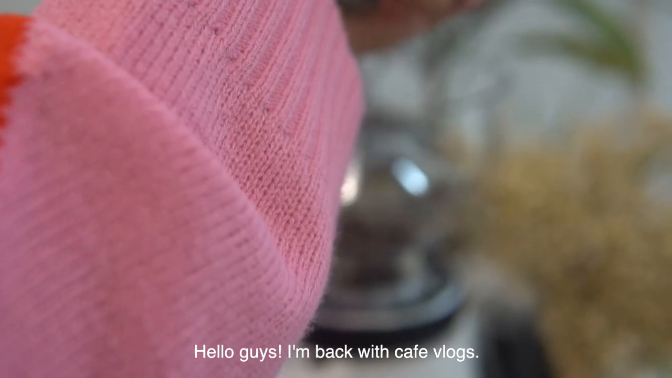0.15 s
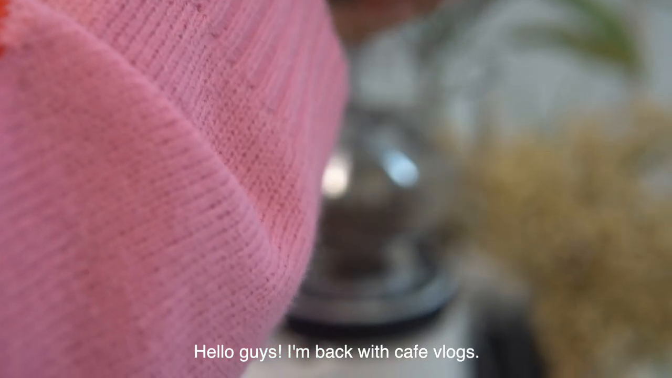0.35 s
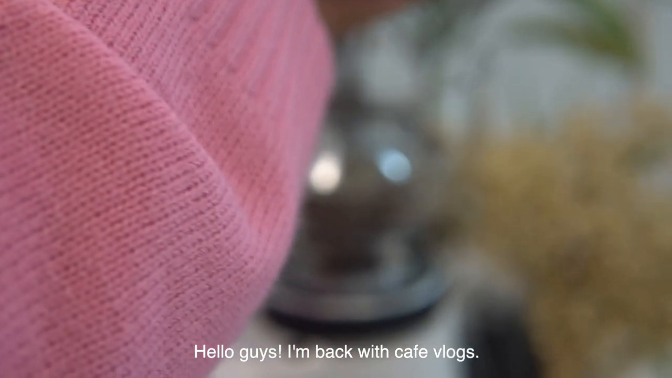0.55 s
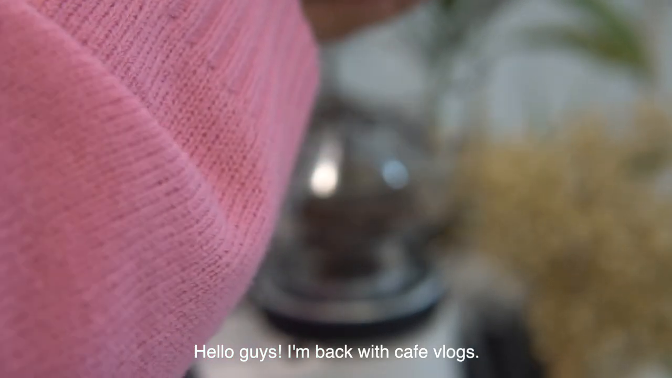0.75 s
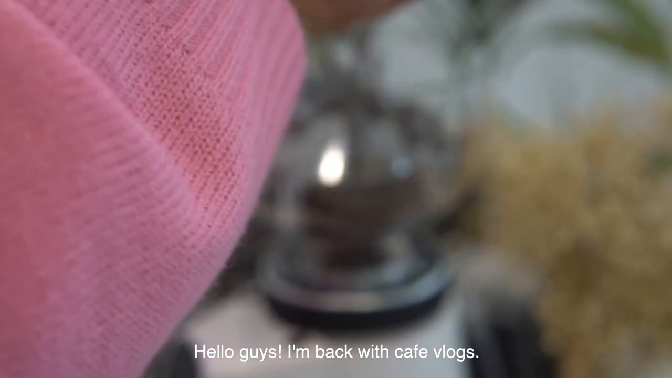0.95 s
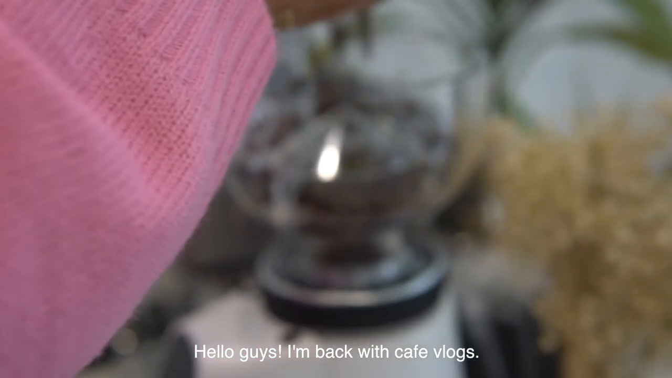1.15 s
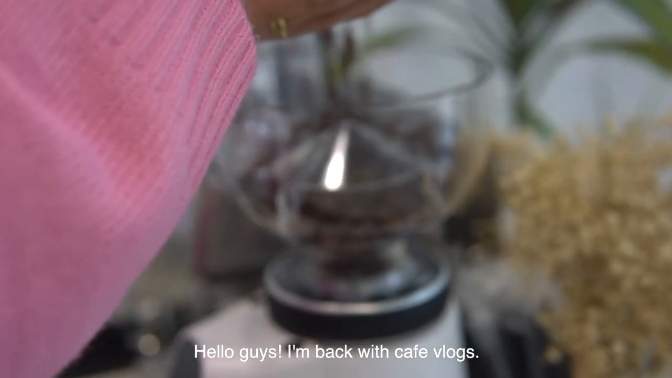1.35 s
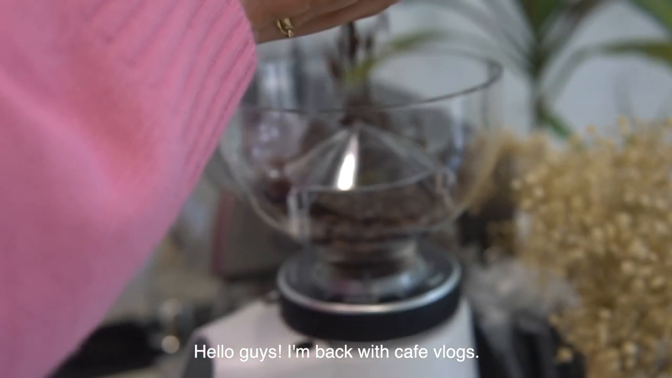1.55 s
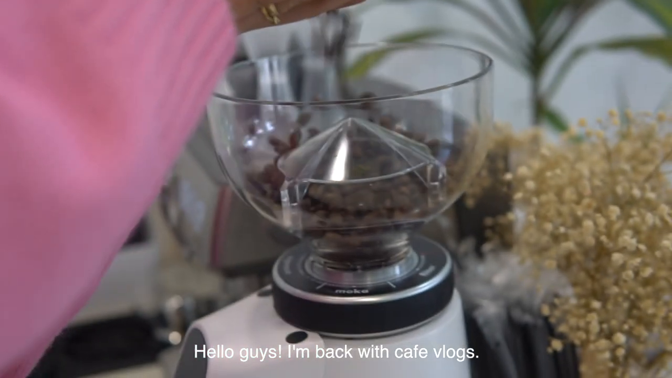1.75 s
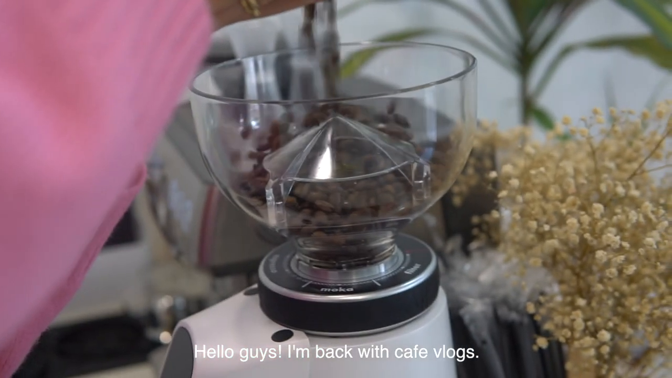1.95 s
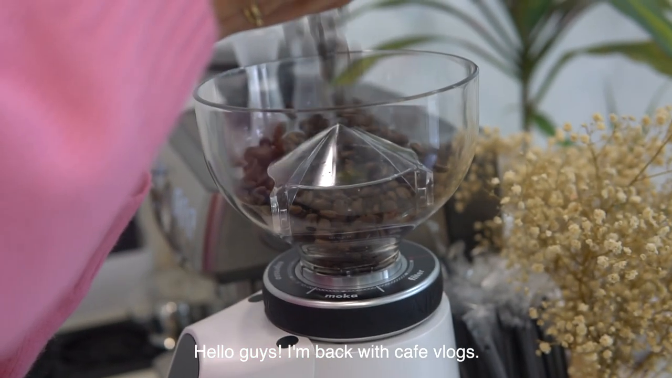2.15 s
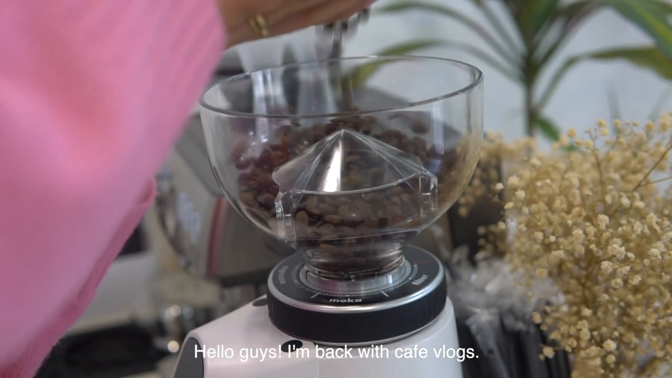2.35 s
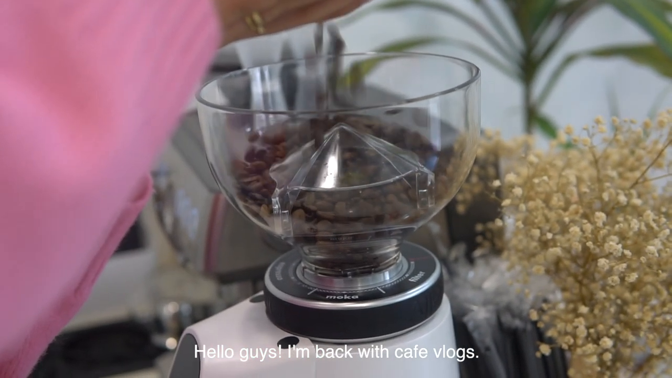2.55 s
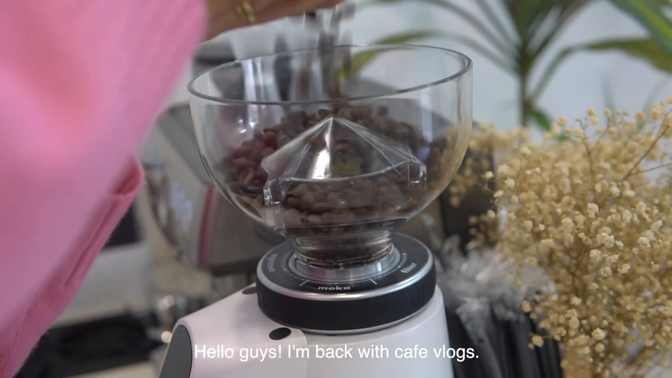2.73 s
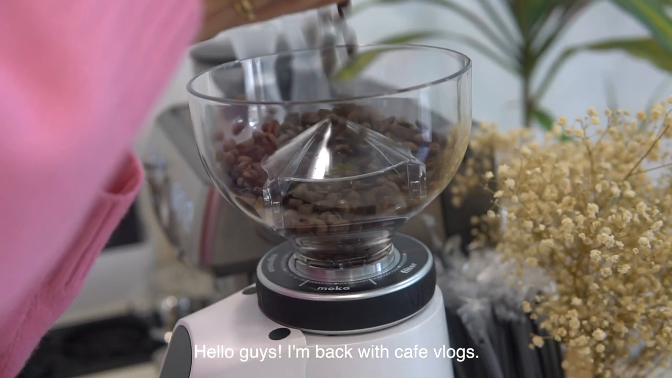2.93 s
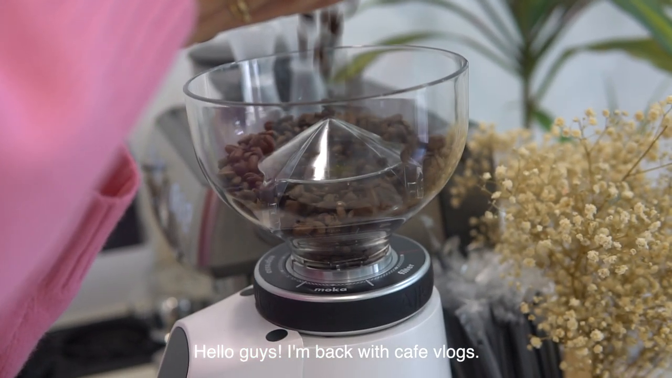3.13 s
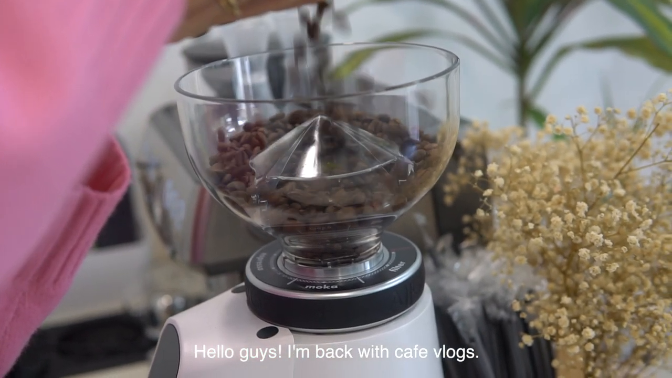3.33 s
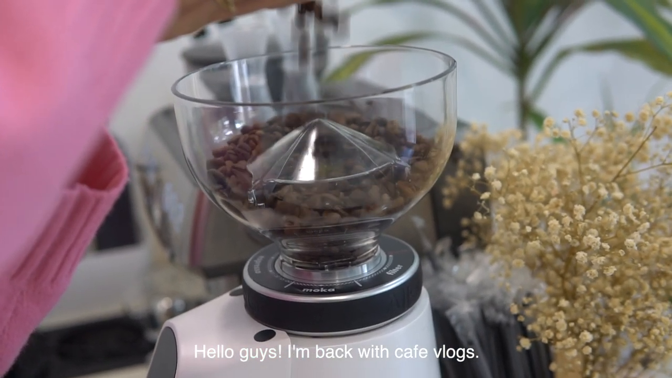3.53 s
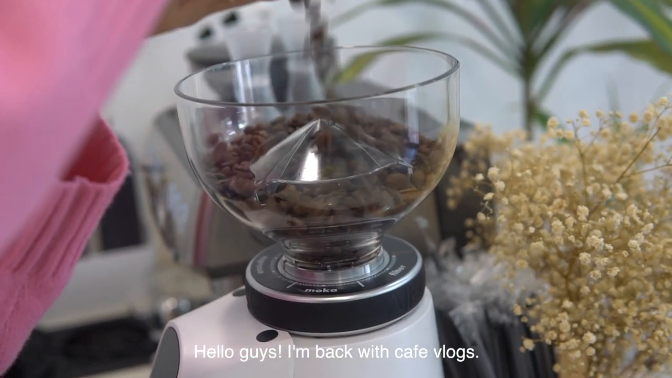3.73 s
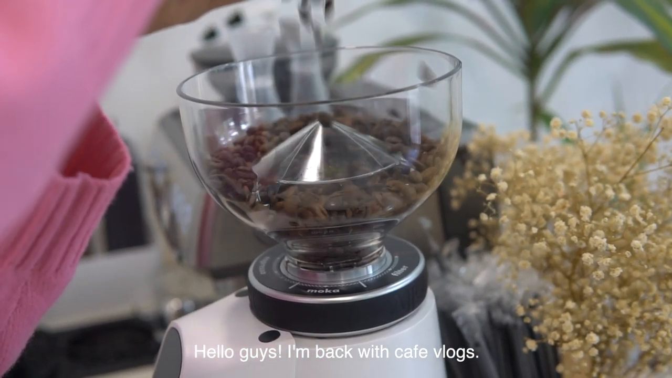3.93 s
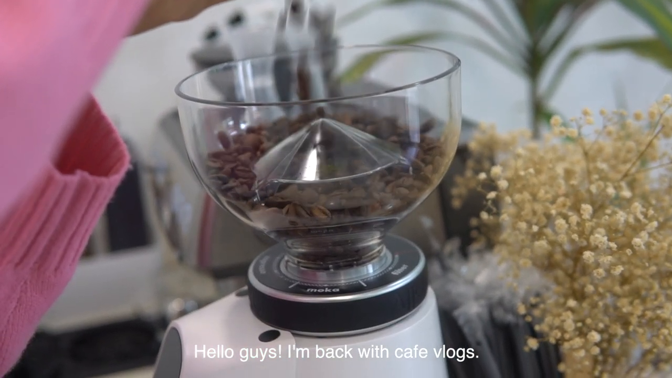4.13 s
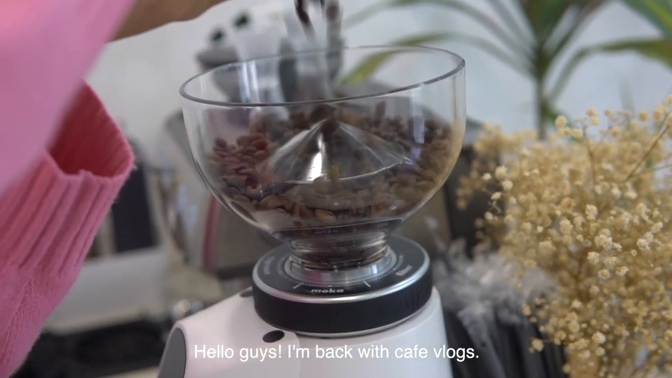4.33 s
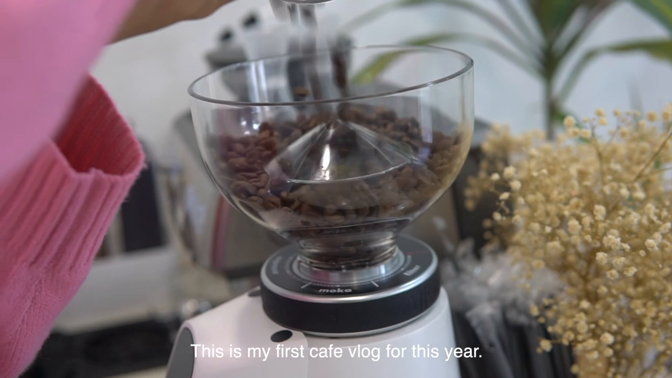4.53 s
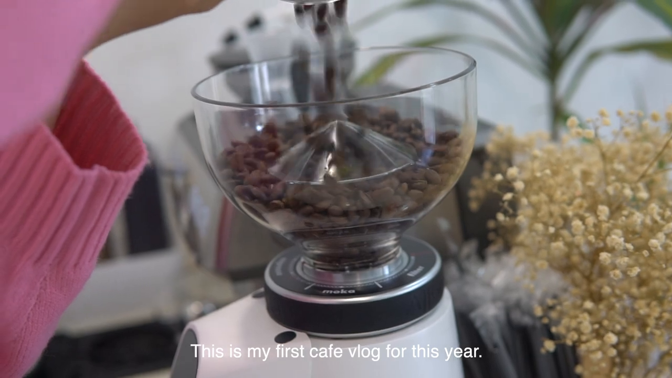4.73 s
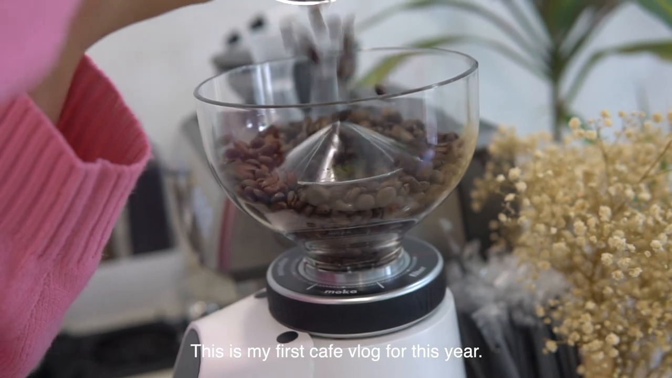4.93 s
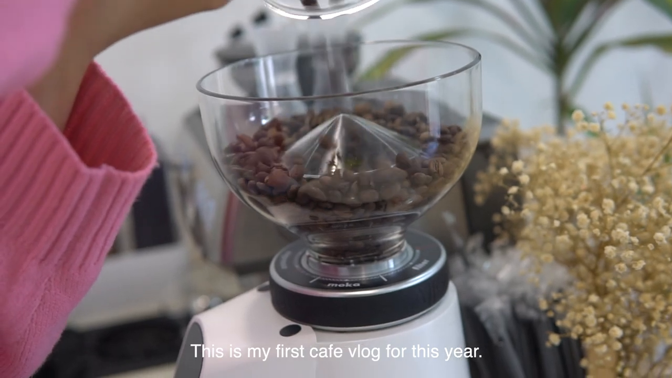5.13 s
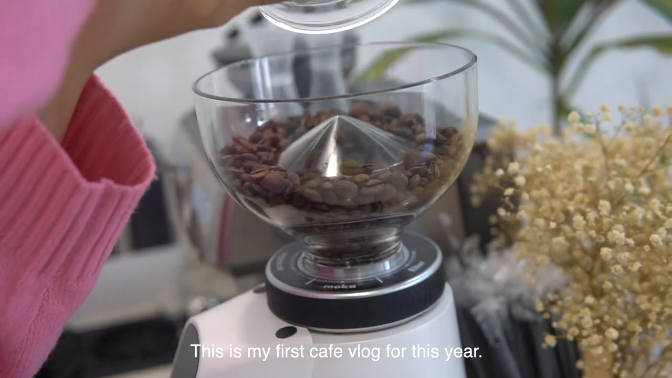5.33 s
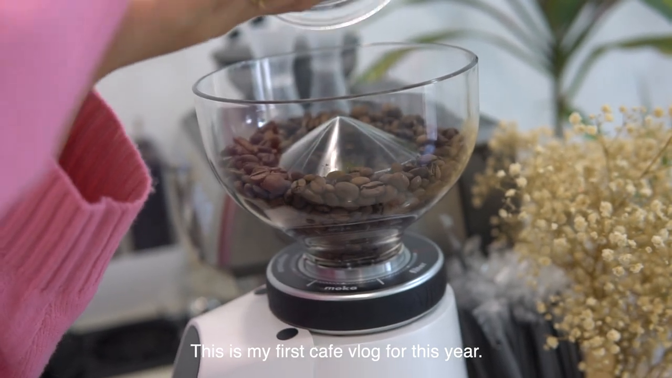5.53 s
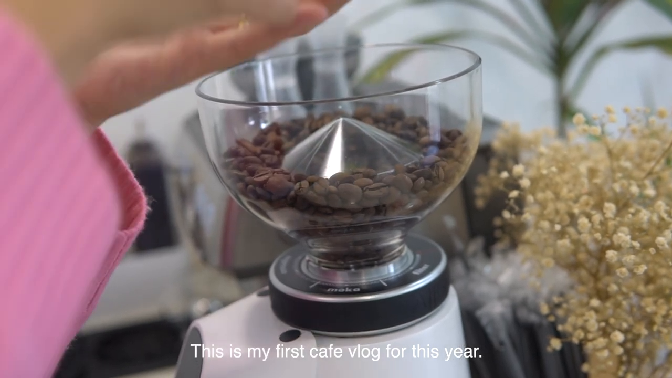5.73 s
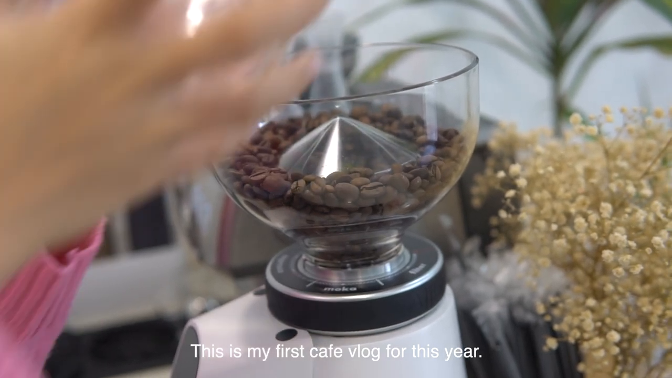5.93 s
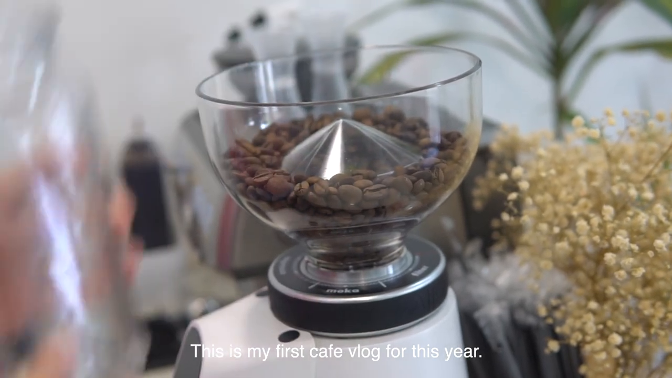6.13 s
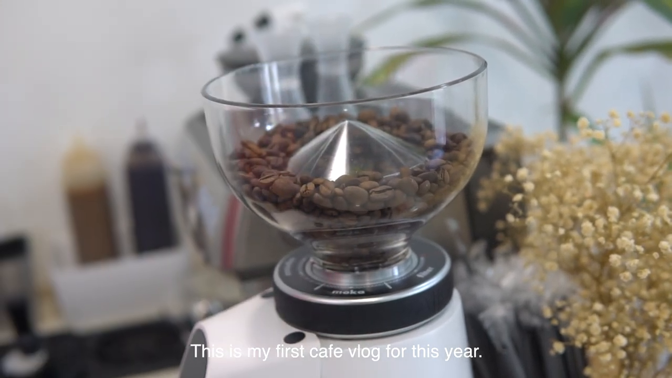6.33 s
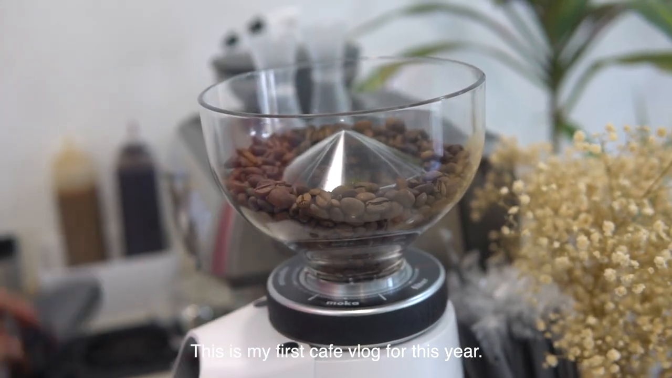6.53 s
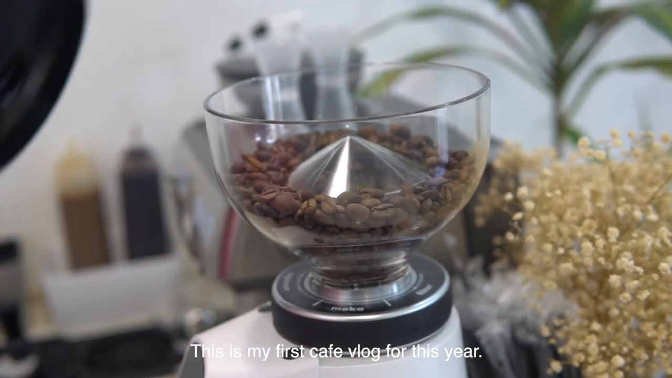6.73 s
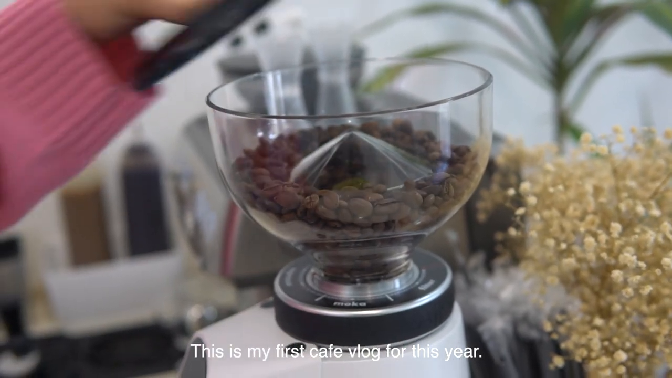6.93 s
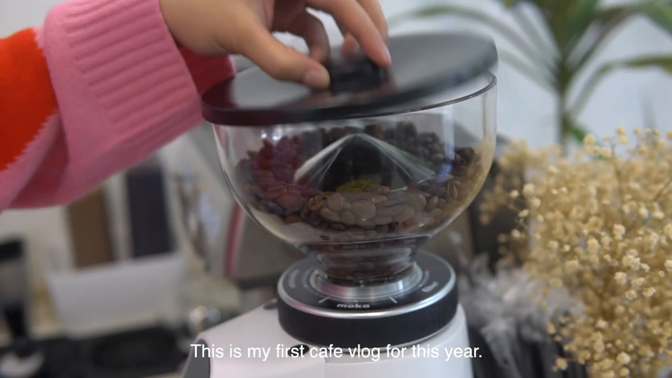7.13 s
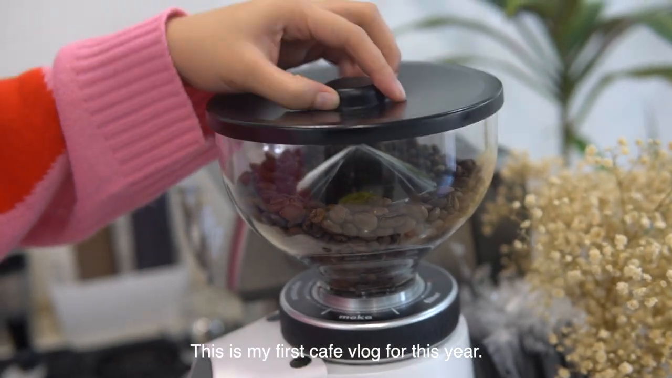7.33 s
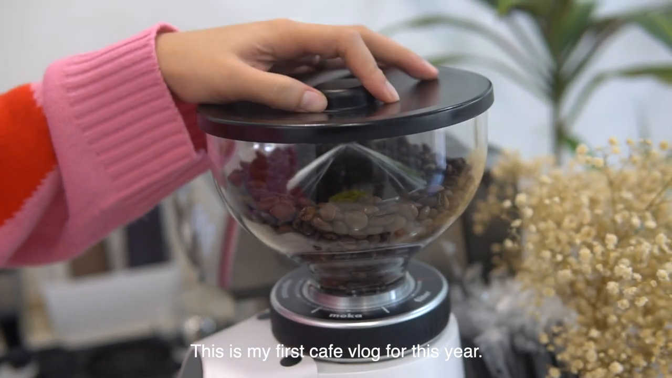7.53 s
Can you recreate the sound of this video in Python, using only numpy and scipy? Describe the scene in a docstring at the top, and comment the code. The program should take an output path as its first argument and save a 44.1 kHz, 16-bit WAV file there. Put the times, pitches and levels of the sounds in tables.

```python
"""Coffee beans poured into a hopper

Beans pour into a grinder's plastic hopper in a hard-walled cafe; the stream thins out and stops.
Random impacts excite resonances of wall and bowl. A small metal piece slides and sings by friction.
After a cut to a second shot the room is louder; a lid taps the rim and is slid home in a few pushes.
Feedback delays form the echo; filtered noise forms the room hum and the microphone hiss."""
import sys
import numpy as np
from scipy import signal
from scipy.fft import rfft, irfft, next_fast_len
from scipy.io import wavfile
from scipy.ndimage import uniform_filter1d

SR = 44100
rng = np.random.default_rng(int(sys.argv[2]) if len(sys.argv) > 2 else 0)


def int16_out(signal):
    """Quantize to a 16-bit WAV file."""
    q = np.round(np.clip(np.atleast_2d(signal).T, -1, 1) * 32767)
    wavfile.write(sys.argv[1], SR, q.astype(np.int16))


N = 334013
TIME = np.arange(N) / SR

# Levels in the tables are nominal: the source functions add their own offsets.
# room hum of the first shot: [f/Hz, density/(dB per Hz)]
CAFE_BEFORE = [(18, -71.5), (30, -43.5), (92, -26), (142, -14), (202, -12), (270, -14), (311, -13.5),
               (350, -1.5), (478, -18), (652, -10.5), (770, -19), (910, -13.5), (1130, -22), (2310, -25.5),
               (9000, -51), (11700, -79), (19800, -120)]
# its course: [t/s, level/dB]
CAFE_BEFORE_DB = [(0, -58), (5.5, -59), (6.15, -63.5), (6.25, -57), (6.52, -54)]
# room hum of the second shot: [f/Hz, density/(dB per Hz)]
CAFE_AFTER = [(24, -63), (40, -48), (138, -10), (263, -14), (346, -0.5), (478, -12), (643, -6),
              (933, -15.5), (1170, -27), (1780, -32.5), (2110, -22.5), (2710, -37), (3350, -42),
              (4030, -36.5), (4600, -46), (5040, -47.5), (15000, -60)]
# reverberation time: [f/Hz, T60/s]
CAFE_T60 = [(100, 0.15), (1000, 1), (4000, 0.67), (15000, 0.57)]
# stereo width: [f/Hz, side re mid level/dB]
SIDE_DB = [(60, -29.5), (130, -25.5), (290, -15.5), (640, -13.5), (1410, -10.5), (3100, -6), (6820, -3.5),
           (15000, -10)]
# stereo balance: [f/Hz, left re right level/dB]
LEFT_DB = [(60, -1.2), (130, -1), (290, -1.5), (640, -1), (1410, 0), (3100, 1), (6820, 5.5), (15000, -1.5)]
# the two microphone ports sit a little apart: [f/Hz, phase lead of left/rad]
LEFT_LEADS = [(100, -0.15), (300, -0.3), (600, -0.3), (2580, -0.03), (4050, -0.2), (5250, -0.1),
              (6290, -0.2), (8000, -0.1)]

# lid on the rim: [t/s, peak level/dB]
LID_TAP = [(7.128, -25), (7.193, -43)]
# modes of the lid: [f/Hz, width/Hz, rubbed level/dB, tapped level/dB]
LID = [(141.5, 13, -4.5, -26), (188, 17, -3.5, -22), (268, 56, -4.5, -3.5), (352, 25, 3.5, -3),
       (522, 26, -10.5, -7), (634, 33, -13, 9.5), (807, 74, -12.5, -1), (1150, 85, -14, -5),
       (1300, 63, -11, -23), (1550, 110, -12, -25), (1980, 130, -13, -25), (2370, 125, -11.5, -8.5),
       (2566, 66, -13.5, -16), (3500, 94, -17, -34)]
# colour of the scrape: [f/Hz, density/(dB per Hz)]
LID_HISS = [(530, -37), (900, -9), (1200, 0.5), (1690, -7), (2360, -23), (2860, -3.5), (4770, -18),
            (9510, -29), (15500, -47)]
# pushes along the rim: [t of full pressure/s, body level/dB, build-up/s,
#  thud re body level/dB, scrape re body level/dB]
LID_PUSHES = [(7.135, -33.5, 0.0087, -11, -31), (7.258, -28.5, 0.038, -13, -2.5),
              (7.32, -36.5, 0.02, -10, -7), (7.488, -33, 0.03, 1, 6), (7.508, -36, 0.01, 4.5, 4)]

# sliding metal: [t/s, first, second, third long mode rms level/dB, upper modes level/dB]
SLIDE = [(6.172, -63, -74, -76, -77), (6.184, -61, -65, -64, -53), (6.198, -38.5, -37, -55, -46),
         (6.216, -42, -33, -50, -44), (6.276, -43, -49, -55, -50), (6.298, -39, -45, -52, -44),
         (6.312, -31.5, -52, -47, -50), (6.33, -39, -46, -38, -45), (6.348, -43, -49, -56, -42),
         (6.37, -41, -53, -51, -40), (6.402, -41, -46, -53, -46), (6.42, -48, -60, -50, -38),
         (6.456, -46, -56, -56, -51), (6.498, -46, -58, -51, -58), (6.516, -49, -60, -53, -58),
         (6.522, -52, -65, -60, -64)]
# the metal catches: [t/s, peak level/dB]
JOLTS = [(6.223, -32), (6.342, -29), (6.365, -29), (6.416, -30)]
# long modes of the metal: [f/Hz, width/Hz]
SINGING = [(3168, 13.4), (5665, 18), (6005, 28)]
# short modes of the metal: [f/Hz, width/Hz, level/dB]
METAL = [(4330, 43, -29), (4870, 99, -27), (6680, 73, -31), (8820, 63, -18), (8900, 64, -17),
         (10460, 120, -22), (11100, 250, -32), (11650, 56, -25), (12200, 150, -29), (12450, 60, -16),
         (13100, 95, -19), (13500, 160, -22), (13900, 56, -20)]

# bean stream: [t/s, rate/(beans per s), heap height/(0-1)]
STREAM = [(0, 9000, 0), (1.7, 8000, 0.11), (2.7, 6000, 0.32), (3.5, 2800, 0.7), (4.1, 2000, 0.86),
          (5.0, 1500, 1), (5.34, 800, 1), (5.43, 500, 0.8), (5.58, 300, 0.9)]
# loudness of the stream: [t/s, wall rattle level/dB, bean ticks re wall level/dB]
POUR = [(0, -20, -2.5), (.6, -22, -2), (1.2, -20, -1.5), (1.7, -22.5, 0), (1.79, -25, -14),
        (1.862, -22, -3.5), (2.1, -20.5, -3), (2.55, -20, -9), (2.751, -21, -13.5), (3.15, -18, -14),
        (3.45, -21, -12), (3.6, -22.5, -16), (3.66, -28, -5), (3.85, -22.5, -8), (4.05, -34.5, 0),
        (4.5, -26, -2), (4.95, -33.5, 1), (5.3, -33, -2.5), (5.36, -52, 2), (5.43, -51, -6),
        (5.58, -68, -19)]
# beans that clack on the wall: [t/s, peak level/dB, ring f/Hz, bowl re peak level/dB]
LOUD_BEANS = [(0.4124, -15, 2390, -12.5), (0.6384, -5.5, 2420, -16), (0.8095, -15.5, 2400, -13.5),
              (0.9832, -10, 2440, -16), (1.1757, -19, 2420, -30.5), (1.2064, -8, 2310, -15.5),
              (1.3484, -12, 2300, -27.5), (1.8207, -13, 2480, -17.5), (1.8916, -15, 2830, -20),
              (1.9515, -13, 2720, -17.5), (2.0124, -7, 2640, -31.5), (2.0656, -5, 3000, -26),
              (2.2144, -17, 4950, -15), (2.2413, -26, 2680, -21), (2.4185, -8, 2420, -18.5),
              (2.4967, -6, 2470, -15), (2.8154, -5, 5200, -24), (2.9138, -10, 3200, -19.5),
              (3.1048, -6, 2720, -23), (3.1554, -11, 5100, -22), (3.2074, -6, 2800, -14.5),
              (3.261, -14, 2880, -32), (3.3244, -11, 2880, -14), (3.365, -7, 2800, -42),
              (3.4251, -6, 2420, -28), (3.491, -24, 2710, -31), (3.5344, -7.5, 2290, -19.5),
              (3.5728, -16, 2870, -23), (3.594, -11.5, 5080, -17.5), (3.6364, -10, 3400, -27),
              (3.709, -8.5, 2880, -33), (3.7274, -5, 2370, -22), (3.7703, -8.5, 2880, -26.5),
              (3.8182, -7, 4900, -14), (3.8904, -13, 2640, -19.5), (3.9698, -15, 2450, -37),
              (3.9065, -12, 2330, -28), (3.928, -14, 2920, -17), (3.983, -9.5, 2470, -40),
              (3.9923, -20, 2800, -30), (4.004, -28, 2800, -28.5), (4.048, -27, 5100, -16.5),
              (4.0808, -11.5, 2360, -36), (4.1017, -12.5, 2460, -30), (4.1305, -18, 5000, -26),
              (4.137, -12.5, 4840, -30), (4.147, -10, 2570, -30), (4.157, -7.5, 2470, -21.5),
              (4.1956, -11, 2840, -28), (4.209, -11, 2590, -13), (4.2277, -11, 2760, -34),
              (4.263, -23, 2860, -32), (4.2995, -34, 2870, -23.5), (4.3104, -12, 5030, -20),
              (4.347, -19, 2980, -20), (4.378, -18, 3230, -25), (4.394, -15, 2600, -31),
              (4.4368, -11.5, 2820, -17), (4.4927, -14, 2520, -30), (4.508, -11, 2500, -27),
              (4.5434, -14, 2830, -18), (4.567, -13, 2930, -26), (4.6474, -13, 2540, -19),
              (4.6638, -12, 2940, -26.5), (4.6843, -11.5, 2980, -19), (4.724, -37, 5300, -24),
              (4.7402, -9.5, 2850, -35), (4.7681, -18, 2320, -26), (4.8004, -27, 2800, -6),
              (4.8394, -21, 2346, -25), (4.8813, -16, 5230, -19), (4.915, -13, 2520, -33),
              (4.9384, -13.5, 5900, -21), (4.9731, -14, 2960, -21), (4.9901, -5.5, 2930, -28),
              (5.034, -26, 3000, -26), (5.0496, -19, 3030, -22), (5.066, -34, 2880, -15),
              (5.1098, -19, 3030, -20), (5.1726, -18, 2800, -16), (5.2035, -20.5, 2920, -19),
              (5.247, -26, 2700, -12), (5.2922, -18.5, 2960, -21), (5.311, -25, 2960, -20),
              (5.3204, -18.5, 2930, -22), (5.335, -21, 2520, -21.5), (5.373, -21, 4100, -23),
              (5.3971, -26, 3100, -19), (5.428, -36, 2500, -10)]
# thin high pings of bean on bean: [t/s, peak level/dB, ring f/Hz]
PINGS = [(0.5357, -33.5, 14000), (0.6412, -6.5, 12800), (0.8989, -12.5, 11700), (1.3473, -12, 13800),
         (1.4646, -16, 11000), (1.5773, -16, 12800), (1.7489, -10.5, 11750), (1.8193, -11.5, 14400),
         (1.8871, -5.5, 14900), (1.931, -13, 12500), (2.0762, -8, 13500), (2.2418, -26, 12000),
         (2.286, -17.5, 12600), (2.31, -8.5, 10400), (2.31, -5.5, 12800), (2.336, -10, 12500),
         (2.4324, -9.5, 10240), (2.4693, -11, 15000), (2.516, -6, 13300), (2.562, -14.5, 14500),
         (2.593, -10, 12000), (2.7117, -12.5, 8300), (2.835, -7, 11750), (2.957, -15, 11800),
         (3.265, -23, 13300), (3.4496, -24.5, 14700), (3.6396, -12.5, 13300), (3.671, -18.5, 13200),
         (3.7214, -24.5, 10500), (3.7828, -18.5, 13500), (3.8876, -17, 13500), (3.9429, -27, 9760),
         (4.0914, -16, 13700), (4.133, -9.5, 13800), (4.2024, -29, 9000), (4.2872, -17.5, 14200),
         (4.376, -14.5, 15400), (4.4189, -21, 14000), (4.4562, -10, 10500), (4.5027, -24.5, 13700),
         (4.5705, -24.5, 13200), (4.7002, -27, 12900), (4.7671, -23, 13000), (4.9362, -18, 12100),
         (4.9826, -22, 8940), (5.103, -24, 12600), (5.1756, -12.5, 15400), (5.291, -29, 8200),
         (5.3203, -28, 15600)]
# colour of the bare plastic wall: [f/Hz, density/(dB per Hz)]
WALL_EMPTY = [(1000, -45), (1700, -16), (2130, -1), (2420, -6), (2630, -6), (3290, -5), (4190, -10),
              (4910, -9.5), (6020, -11), (6610, -13), (12400, -10), (15100, -13), (15700, -11.5)]
# colour of the wall damped by the heap: [f/Hz, density/(dB per Hz)]
WALL_FULL = [(1000, -51), (1700, -29), (1970, -22.5), (2420, -4), (2840, -5.5), (3580, -8), (4230, -15),
             (5050, -11.5), (7460, -15), (9680, -17.5), (10400, -20.5), (11100, -17), (15700, -19)]
# long modes of the clear wall: [f/Hz, width/Hz, level/dB, gain when full/dB]
WALL_MODES = [(2327, 99, -2.5, -5.5), (2482, 140, -2.5, -4), (2900, 152, -9.5, 5), (3960, 56, -7.5, 0.5),
              (4860, 82, -3.5, -5.5), (5175, 75, -6.5, -2), (5480, 52, -10, -3), (6026, 130, -7, -6)]
# modes of the hopper bowl and its air: [f/Hz, width/Hz, level/dB, gain when full/dB]
BOWL = [(140.9, 7.8, -29, 7.5), (206, 13, -35.5, 17), (284, 6.5, -39, 20.5), (346.5, 9.1, -15, -2.5),
        (539.3, 26, -5, -9.5), (619.4, 23, 3, -7), (644.1, 24, 5, -7), (676, 32, 0.5, -6),
        (736.6, 31, 1, 1.5), (814, 51, -9, 9.5), (919, 33, -23.5, 18), (1046, 30, -22.5, 21),
        (1173, 51, -22, 13.5), (1307, 80, -25, 16), (1498, 47, -13, 11), (1610, 120, -10.5, -9.5)]
# course of the bowl's hollow tone: [t/s, level/dB]
BOWL_LEVEL = [(0.0, -25.5), (0.07, -28), (0.1, -37.5), (0.2, -29.5), (0.24, -32), (0.29, -29),
              (0.39, -38.5), (0.42, -30.5), (0.445, -25.5), (0.49, -28), (0.525, -40), (0.555, -25.5),
              (0.65, -35), (0.68, -36), (0.82, -28.5), (0.9, -34.5), (0.945, -29.5), (0.98, -37.5),
              (1.015, -25.5), (1.065, -31), (1.18, -33), (1.22, -29), (1.245, -38), (1.32, -27.5),
              (1.36, -33), (1.73, -33.5), (1.81, -46.5), (1.85, -33), (2.08, -32), (2.15, -36.5),
              (2.21, -32), (2.41, -32.5), (2.53, -25.5), (2.58, -35.5), (2.85, -31), (2.93, -37),
              (3.34, -37), (3.41, -48), (3.58, -38.5), (3.7, -47.5), (3.73, -37.5), (3.79, -45.5),
              (3.82, -38), (3.99, -52), (4.05, -45), (4.1, -46.5), (4.22, -45.5), (4.25, -51), (4.31, -44),
              (5.36, -53), (5.45, -70)]
# band of the hollow tone: [lower f/Hz, upper f/Hz]
HOLLOW_BAND_HZ = [609.4, 740.4]

CAFE_AFTER_DB = -46
MIC_HISS_DB, MIC_HISS_HZ = -82, 6000
CUT_S, FADE_OUT_S, FADE_IN_FROM_S, FADE_IN_S = 6.521, .003, 6.528, 0.06
CUTOFF_HZ = 16000
# a push climbs during the build-up, then falls steadily
BUILD_DB, EASE_DB_PER_S = 14, 129
SCRAPE_LEAD_S, THUD_LAG_S = 0.0065, 0.0096
# the lid's hiss sets in earlier, by a share of the build-up, and more abruptly
HISS_LEAD_SHARE, HISS_BUILD_DB, HISS_RE_SCRAPE_DB, HISS_EASE_DB_PER_S = 0.72, 34, -14, 106
# how evenly friction feeds a long metal mode, 0-1; lean to the right
STEADINESS, METAL_RIGHT_SHARE = 0.8, 0.22
# quick surges at first and added as the heap grows; slower jerks over the heap
SURGE_DB, SURGE_FULL_DB, JERK_FULL_DB = 1.45, 0.8, 2
BOWL_SWAY_DB = 0.27  # the stream wanders on and off the bowl
# rattle behind a loud bean re its peak on wall, bowl and in the ticks; its decay
CLUMP_WALL_DB, CLUMP_BOWL_DB, CLUMP_TICK_DB, CLUMP_FADE_DB_PER_S = -14.5, -9, -13, 281.5
EMPTY_RING_DB = 12.5  # bowl modes near 1.2 kHz ring out until the first beans cover them
# how evenly the stream feeds the hollow tone, 0-1; level re its curve
HOLLOW_STEADINESS, HOLLOW_DB = 0.29, -2.5


def from_db(db):
    """Decibel definition: the amplitude ratio of a level."""
    return 10 ** (np.asarray(db) / 20)


def at_hz(points, hz):
    """Linear interpolation on a logarithmic frequency axis."""
    f, value = np.transpose(points)
    return np.interp(np.log(hz), np.log(f), value)


def at_times(rows, s):
    """Linear interpolation in time of every column of a curve."""
    t, *columns = np.transpose(rows)
    return [np.interp(s, t, c) for c in columns]


def bank(low_hz, high_hz, count):
    """Constant-ratio spacing: pitches spread evenly on a log axis."""
    return np.geomspace(low_hz, high_hz, count)


def low_pass(x, hz, order):
    """Butterworth low-pass: removal of the highs."""
    return signal.sosfilt(signal.butter(order, hz, fs=SR, output="sos"), x)


def high_pass(x, hz):
    """Butterworth high-pass of fourth order: steep removal of the lows."""
    return signal.sosfilt(signal.butter(4, hz, "high", fs=SR, output="sos"), x)


def band_pass(x, band_hz, order=2):
    """Butterworth band-pass: isolation of one mode."""
    return signal.sosfilt(signal.butter(order, band_hz, "band", fs=SR, output="sos"), x)


def wobble(size):
    """Moving average of white noise over size samples: slow chance of unit spread."""
    return uniform_filter1d(rng.standard_normal(N), size) * np.sqrt(size)


def capped_chance(count):
    """Exponential distribution, capped at 3."""
    return np.minimum(rng.exponential(1, count), 3)


def contacts(t0, t1, per_s, spread_db):
    """Random arrivals: contact times and sizes in dB, evened to unit power at any density."""
    per_s = per_s * np.ones(N)
    hit = (rng.random(N) < per_s / SR) & (TIME > t0) & (TIME < t1)
    size = from_db(spread_db * capped_chance(N))
    size_db = 20 * np.log10(size / np.sqrt(np.mean(size ** 2) * per_s / SR))
    return TIME[hit], size_db[hit]


def strike(s, level_db, hz, width_hz):
    """Impulse response of a damped resonator, struck with chance strengths; rows are mid and side."""
    clicks = np.full((2, N), 1e-18)
    luck = rng.standard_normal((len(s), 4)).T
    clicks[:, (s * SR).astype(int)] = from_db(level_db + 2.18 * luck[:2]) * np.sign(luck[2:])
    r = np.exp(-np.pi * width_hz / SR)
    zeros = [(1 - r * r) / 2, 0, (r * r - 1) / 2]
    poles = [1, -2 * r * np.cos(2 * np.pi * hz / SR), r * r]
    mid, other = signal.lfilter(zeros, poles, clicks)
    # a slope in quadrature with mid makes the left channel's phase lead
    slope = np.gradient(mid) / np.sin(2 * np.pi * min(hz, 8000) / SR)
    ahead = np.tan(at_hz(LEFT_LEADS, hz) / 2) * slope * (hz < 8000)
    lean = np.tanh(at_hz(LEFT_DB, hz) * np.log(10) / 40)
    return np.array([mid, from_db(at_hz(SIDE_DB, hz)) * other + lean * mid + ahead])


def singles(s, peak_db, ring_hz, cycles):
    """Beating of two close decaying tones for each lone hit, placed a little left or right."""
    out, t = np.zeros((2, N)), np.arange(2000) / SR
    chance = rng.uniform(-0.87, 1, (len(s), 3))
    for at, db, hz, (a, b, lean) in zip((s * SR).astype(int), peak_db, ring_hz, chance):
        pair = np.sin(2 * np.pi * hz * (1 + 0.023 * a) * t)
        pair += 0.26 * np.sin(2 * np.pi * hz * (1 + 0.056 * b) * t)
        swell = (1 - np.exp(-t * hz / 3.2)) ** 2  # over a few cycles
        ring = from_db(db - 60 * (t * hz / cycles) ** 1.19) * pair * swell
        side = lean * from_db(at_hz(SIDE_DB, hz) + 2.5)
        out[:, at:at + len(t)] += ring * np.array([[1], [side]])
    return out


def with_clumps(s, stream_db, lead_s, lead_db):
    """Power addition of an exponentially dying rattle behind every leading hit."""
    power = np.zeros(N)
    power[(lead_s * SR).astype(int)] = from_db(2 * lead_db)
    power = signal.lfilter([1], [1, -from_db(-2 * CLUMP_FADE_DB_PER_S / SR)], power + 1e-18)
    return 10 * np.log10(from_db(2 * stream_db) + power[(s * SR).astype(int)])


def steady(x, share):
    """Envelope compression: evens out the chance swells of a narrow tone, to about unit rms at share 1."""
    swell = np.abs(signal.hilbert(x[0], next_fast_len(N))[:N]) / np.sqrt(2)
    busy = np.sqrt(np.mean(swell[swell > swell.max() / 20] ** 2))
    smooth = uniform_filter1d(swell, size=200) / busy
    return x / busy / (smooth + 0.1) ** np.clip(share, 0, 1)


def mic_hiss():
    """Broadband electrical noise of the microphone, low-passed."""
    return from_db(MIC_HISS_DB) * low_pass(rng.standard_normal(N), MIC_HISS_HZ, 1)


def cafe_hum(spectrum, level_db):
    """Spectral shaping of noise: far-off fridges and ventilation, mid and side, a little right."""
    hz = np.maximum(np.arange(N // 2 + 1) * SR / N, 1)
    gain = from_db(at_hz(spectrum, hz)) * from_db([0 * hz, at_hz(SIDE_DB, hz)])
    noise = irfft(rfft(rng.standard_normal((2, N))) * gain, N)
    noise[1] -= 0.08 * noise[0]
    return from_db(level_db) * noise / np.std(noise[0])


def cafe_echo(x):
    """Reverberation: ten feedback delays each for mid and side, T60 by frequency, smeared by allpasses."""
    size = next_fast_len(N + SR)
    hz = np.maximum(np.arange(size // 2 + 1) * SR / size, 1)
    t60, out = np.clip(at_hz(CAFE_T60, hz), .05, 1.5), []
    for row in x:
        combs = 0
        for k, lag in enumerate(rng.uniform(.015, .05, 10)):
            loop = from_db(-60 * lag / t60) * np.exp(-2j * np.pi * hz * lag)
            combs = combs + (-1) ** k * loop / (1 - loop)
        for lag in rng.uniform(.001, .006, 3):
            turn = np.exp(-2j * np.pi * hz * lag)
            combs = combs * (turn - .6) / (1 - .6 * turn)
        out.append(irfft(rfft(row, size) * combs, size)[:N])
    return np.array(out) / np.sqrt(10)


def pressure_db(s, peak_db, lag_s, climb_db, ease):
    """Power addition of pushes that each climb to a peak and ease off."""
    at, _, build_s, *_ = np.transpose(LID_PUSHES)
    since = s[:, None] - at - lag_s
    shape = np.where(since < 0, climb_db * since / np.maximum(build_s, .002), -ease * since)
    return 10 * np.log10(np.sum(from_db(peak_db + shape) ** 2, axis=1) + 1e-20)


def lid():
    """Modal and frictional excitation: a tap and a fainter one, and a rub that brightens with pressure."""
    s, size_db = contacts(LID_TAP[0][0], 8, 2000, spread_db=0.0)
    _, body, build_s, thud, rough = np.transpose(LID_PUSHES)
    body_db = pressure_db(s, body, 0, BUILD_DB, EASE_DB_PER_S)
    thud_db = pressure_db(s, body + thud, THUD_LAG_S, BUILD_DB, EASE_DB_PER_S)
    scrape_db = pressure_db(s, body + rough, -SCRAPE_LEAD_S, BUILD_DB, EASE_DB_PER_S)
    hiss_peak_db, hiss_lag_s = body + rough + HISS_RE_SCRAPE_DB, -HISS_LEAD_SHARE * build_s
    hiss_db = pressure_db(s, hiss_peak_db, hiss_lag_s, HISS_BUILD_DB, HISS_EASE_DB_PER_S)
    tap_s, tap_db = np.transpose(LID_TAP)
    modes = scrape = 0
    for hz in bank(960, 15000, count=14):
        band_db = scrape_db + 9.0 if hz < 4000 else hiss_db + 23.0
        scrape = scrape + strike(s, band_db + size_db + at_hz(LID_HISS, hz), hz, 0.11 * hz)
    for hz, width, rubbed_db, tapped_db in LID:
        if hz < 305:
            rub_db = thud_db + 26.5
        elif hz < 950:
            rub_db = body_db + 22
        else:
            rub_db = scrape_db + 22.0
        modes = modes + strike(s, size_db + rub_db + rubbed_db, hz, width)
        tapped = strike(tap_s, tap_db + tapped_db + 33.5, hz, width)
        modes = modes + band_pass(tapped, [0.88 * hz, 1.2 * hz], 1)  # soft: rings, little click
    # a thick soft lid rings little treble
    return high_pass(low_pass(modes, 3300, 8) + scrape, 125)


def sliding_metal():
    """Friction-driven resonance: fine contacts keep long modes singing, over short modes and a hiss."""
    start_s = SLIDE[0][0]
    s, size_db = contacts(start_s, SLIDE[-1][0], 6000, spread_db=5.5)
    jolt_s, jolt_db = np.transpose(JOLTS)
    upper_db = with_clumps(s, at_times(SLIDE, s)[3] - 2.5, jolt_s, jolt_db - 20.0) + size_db
    hiss = 0
    for hz in bank(5200, 14500, count=7):
        hiss = hiss + strike(s, upper_db + 3.9 * np.log2(hz / 12000) + 1.5, hz, 0.12 * hz)
    out = low_pass(high_pass(hiss, 5000), 14500, 4)
    for hz, width, db in METAL:
        mode = strike(s, upper_db + db + 33.0, hz, width)
        out += band_pass(mode, [.94 * hz, 1.06 * hz])  # silence between modes
    # the long modes are already ringing when they become audible
    lead = np.arange(start_s - .05, start_s, .001)
    for (hz, width), level_db in zip(SINGING, at_times(SLIDE, TIME)):
        mode = strike(np.r_[lead, s], np.r_[0 * lead + 8, size_db], hz, width)
        mode = steady(band_pass(mode, [.97 * hz, 1.03 * hz]), STEADINESS)
        out += from_db(level_db) * (TIME > start_s) * band_pass(mode, [.978 * hz, 1.022 * hz])
    out[1] -= METAL_RIGHT_SHARE * out[0]
    return out


def hollow_tone(s, size_db, heap):
    """Common modulation: the bowl's strongest modes, fed by the whole stream, swell and sink together."""
    tone = 0
    for hz, width, db, full_db in BOWL:
        if 630 < hz < 750:
            tone = tone + strike(s, size_db + db + full_db * heap, hz, width)
    tone = band_pass(tone, HOLLOW_BAND_HZ)
    slow = np.sqrt(uniform_filter1d(tone[0] ** 2, size=20000) + 1e-6)
    even = band_pass(steady(tone / slow, HOLLOW_STEADINESS), HOLLOW_BAND_HZ)
    return from_db(at_times(BOWL_LEVEL, TIME)[0] + HOLLOW_DB) * even


def bowl_knocks(s, bowl_db, heap):
    """Modal excitation of the bowl and its air by the rain and the loud beans."""
    loud_s, peak_db, _, loud_bowl_db = np.transpose(LOUD_BEANS)
    bowl = 0
    for hz, width, db, full_db in BOWL:
        empty_db = (900 < hz < 1400) * EMPTY_RING_DB * np.exp(-heap / .06)
        rain_db = bowl_db + full_db * heap + empty_db + 19 - 9.0 * (580 < hz < 770)
        loud_db = peak_db + loud_bowl_db + 36 - 6.0 * (hz > 900) - 10.5 * (hz < 580)
        bowl = bowl + strike(np.r_[s, loud_s], np.r_[rain_db, loud_db] + db, hz, width)
    return high_pass(bowl, 105)


def wall_rattle(s, wall_db, tick_db, heap):
    """Broadband impact spectrum, damped by the heap: each bean rings around a pitch of its own."""
    loud_s, peak_db, ring_hz, _ = np.transpose(LOUD_BEANS)
    ping_s, ping_db, ping_hz = np.transpose(PINGS)
    pitch_hz = 1600 * 2 ** rng.uniform(0, 3.39, len(s))
    wall = 0
    for hz in bank(1797, 15960, count=52):
        colour_db = (1 - heap) * at_hz(WALL_EMPTY, hz) + heap * at_hz(WALL_FULL, hz)
        hard = np.clip(np.log2(hz / 6000) / 0.43, 0, 1)  # the top is the beans' own tick
        pitch_db = np.maximum(-400 * np.log2(hz / pitch_hz) ** 2, -19)
        rain_db = (1 - hard) * wall_db + hard * (tick_db + 3.0) + colour_db
        rain_db += pitch_db + 21.5 - 2.82 * heap
        clack_db = peak_db + 7.5 - 39.0 * np.abs(np.log2(hz / ring_hz))  # the crack around the ring
        high_db = ping_db + 2.5 - 12.0 * np.abs(np.log2(hz / ping_hz))
        times, levels_db = np.r_[s, loud_s, ping_s], np.r_[rain_db, clack_db, high_db]
        wall = wall + strike(times, levels_db, hz, 0.037 * hz)
    for hz, width, db, full_db in WALL_MODES:
        wall = wall + strike(s, wall_db + db + full_db * heap + 10.5, hz, width)
    wall = wall + singles(loud_s, peak_db - 2.0, ring_hz, cycles=42.0)
    wall = wall + singles(ping_s, ping_db - 9.0, ping_hz, cycles=360.0)
    # a clack also rings about an octave up
    wall = wall + singles(loud_s, peak_db - 18.0, 2.08 * ring_hz, cycles=130.0)
    return high_pass(wall, 1850)


def beans():
    """Superposition of random impacts: a dense uneven rain of beans plus single loud ones."""
    surge, jerk, sway = wobble(size=900), wobble(size=3500), wobble(size=5000)
    per_s = np.clip(at_times(STREAM, TIME)[0], 30, 15000)
    s, size_db = contacts(0, POUR[-1][0], per_s, spread_db=0.5)
    heap, at = np.clip(at_times(STREAM, s)[1], 0, 1), (s * SR).astype(int)
    loud_s, peak_db, _, loud_bowl_db = np.transpose(LOUD_BEANS)
    ping_s, ping_db, _ = np.transpose(PINGS)
    stream_db, tick_re_db = at_times(POUR, s)
    uneven_db = size_db + (SURGE_DB + SURGE_FULL_DB * heap) * surge[at]
    uneven_db += JERK_FULL_DB * heap * jerk[at]
    wall_db = uneven_db + with_clumps(s, stream_db, loud_s, peak_db + CLUMP_WALL_DB)
    wall_db += heap * 2.6 * (capped_chance(len(s)) - 1.6)  # a thin stream breaks into single knocks
    tick_db = uneven_db + with_clumps(s, stream_db + tick_re_db, ping_s, ping_db + CLUMP_TICK_DB)
    # under a heap few beans still knock the bowl
    reach_db = heap * 4.3 * (capped_chance(len(s)) - 1.8)
    bowl_db = at_times(BOWL_LEVEL, s)[0] + BOWL_SWAY_DB * sway[at]
    bowl_db = with_clumps(s, bowl_db, loud_s, peak_db + loud_bowl_db + CLUMP_BOWL_DB)
    bowl_db += uneven_db + reach_db
    wall, bowl = wall_rattle(s, wall_db, tick_db, heap), bowl_knocks(s, bowl_db, heap)
    return wall + bowl + hollow_tone(s, uneven_db + reach_db, heap)


def scene():
    """Superposition in two shots joined by a cut: the pour and the metal, then the lid."""
    pour, metal, cover = beans(), sliding_metal(), lid()
    hum = cafe_hum(CAFE_BEFORE, at_times(CAFE_BEFORE_DB, TIME)[0])
    first = pour + metal + cafe_echo(from_db(-8.0) * pour + from_db(-11) * metal) + hum
    second = cover + from_db(-5.5) * cafe_echo(cover) + cafe_hum(CAFE_AFTER, CAFE_AFTER_DB)
    second[0] += mic_hiss()  # in the middle only
    fade_out = np.clip((CUT_S - TIME) / FADE_OUT_S, 0, 1)
    fade_in = np.clip((TIME - FADE_IN_FROM_S) / FADE_IN_S, 0, 1)
    mid, side = fade_out * first + fade_in * second
    return np.array([mid + side, mid - side])


def record(dry):
    """Band limiting: a steep low-pass cuts the top."""
    return signal.sosfilt(signal.cheby2(20, 55, CUTOFF_HZ, fs=SR, output="sos"), dry)


dry = scene()
out = record(dry)
int16_out(out)
```